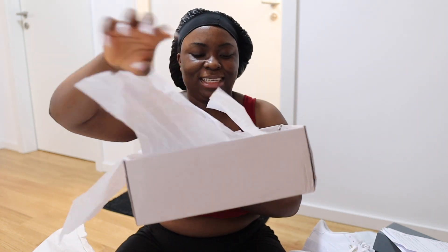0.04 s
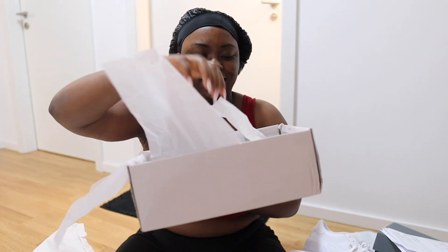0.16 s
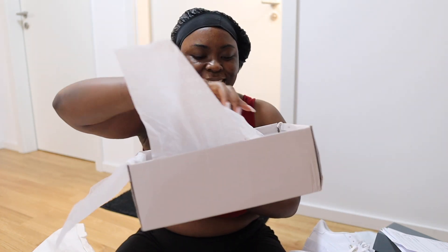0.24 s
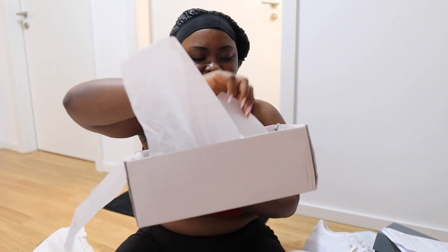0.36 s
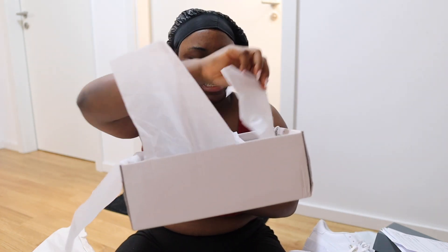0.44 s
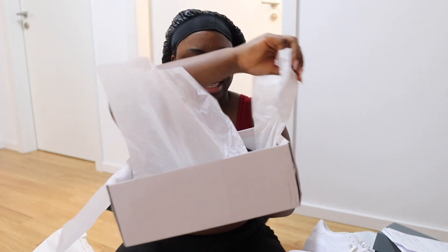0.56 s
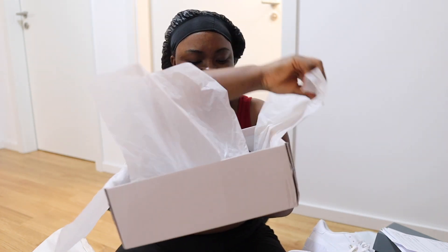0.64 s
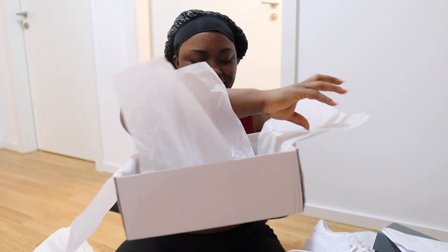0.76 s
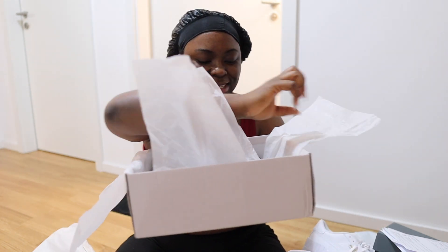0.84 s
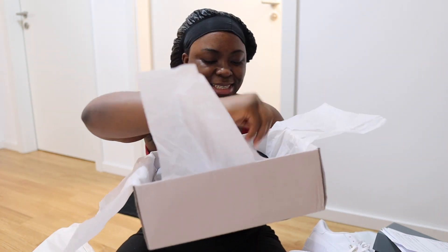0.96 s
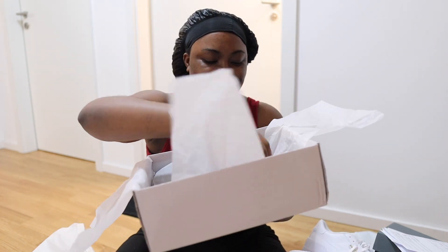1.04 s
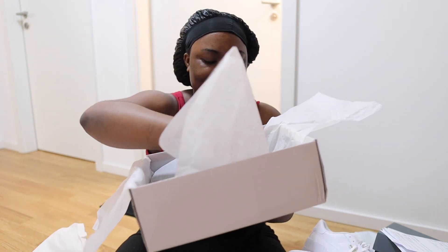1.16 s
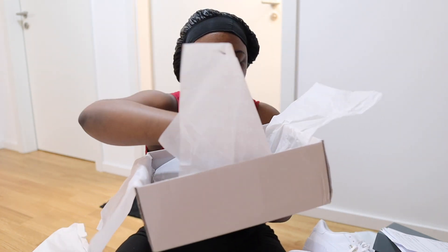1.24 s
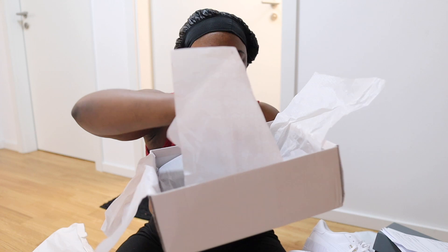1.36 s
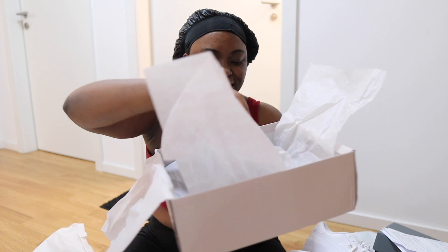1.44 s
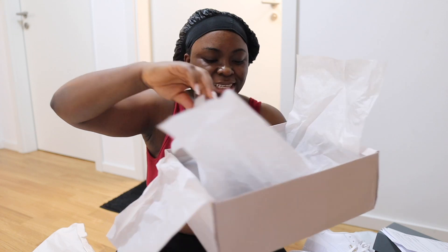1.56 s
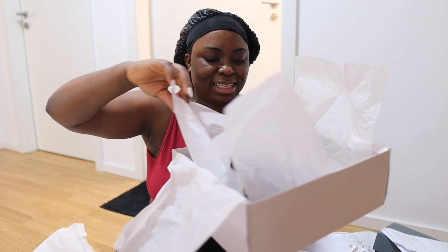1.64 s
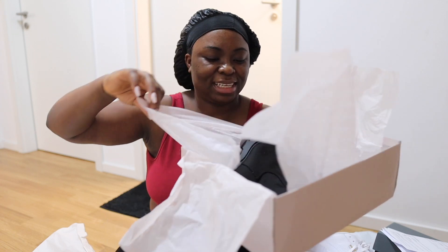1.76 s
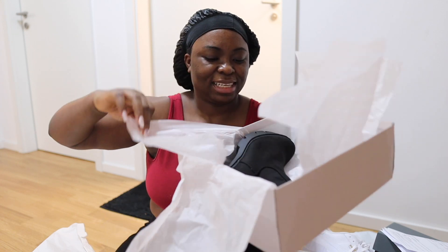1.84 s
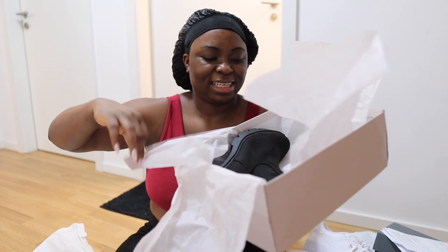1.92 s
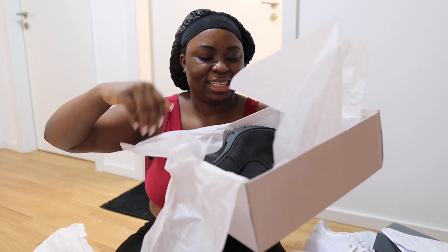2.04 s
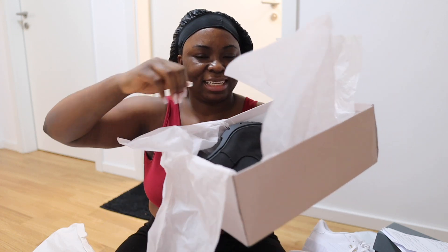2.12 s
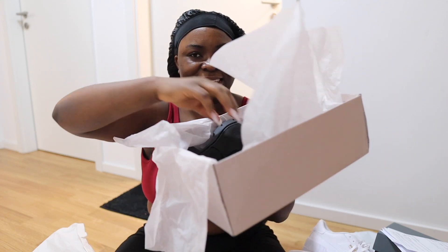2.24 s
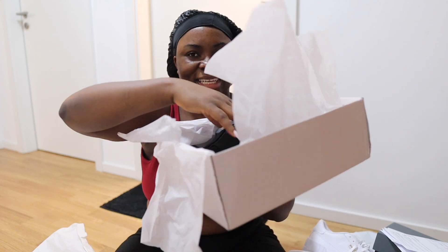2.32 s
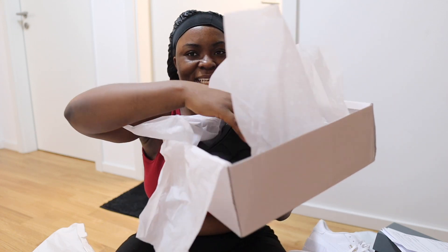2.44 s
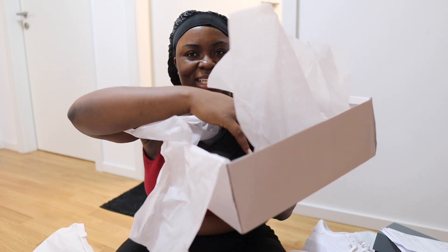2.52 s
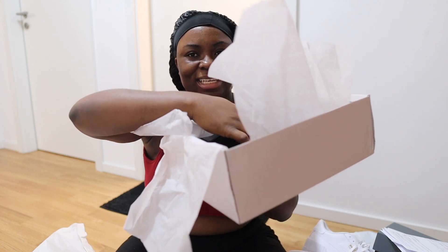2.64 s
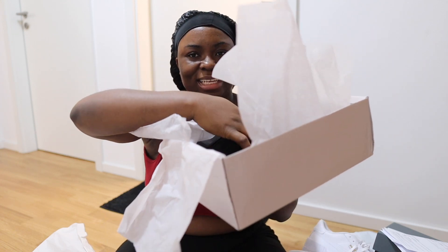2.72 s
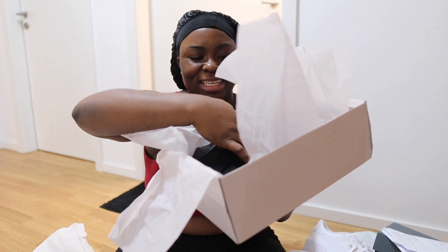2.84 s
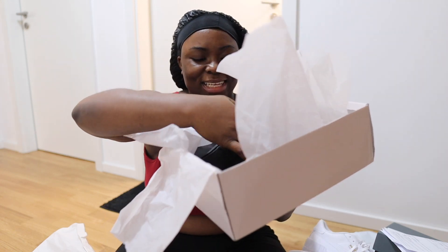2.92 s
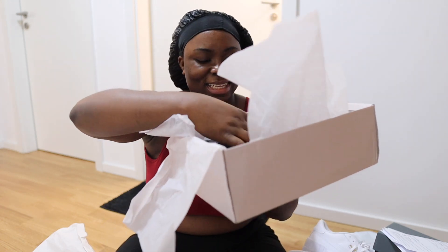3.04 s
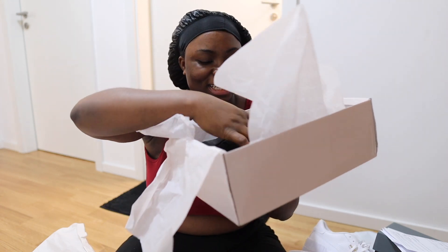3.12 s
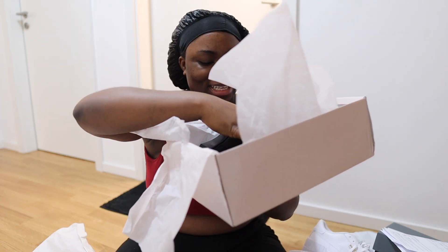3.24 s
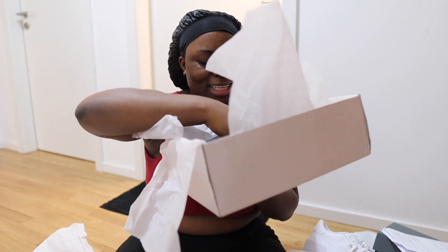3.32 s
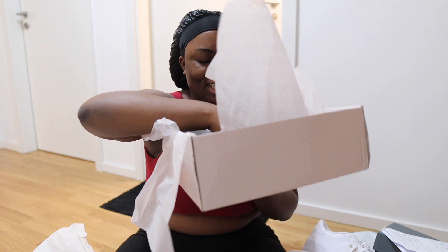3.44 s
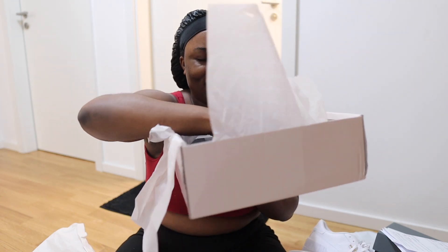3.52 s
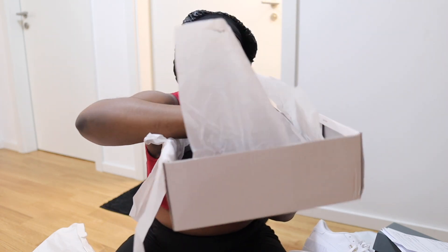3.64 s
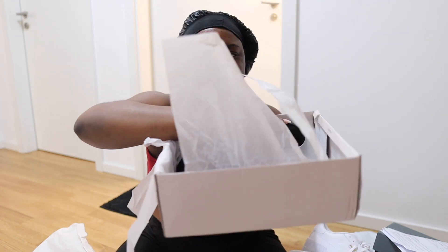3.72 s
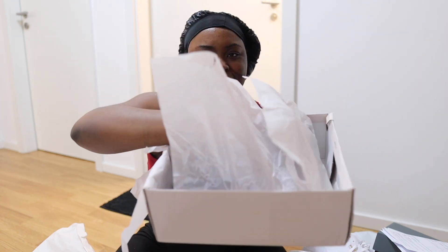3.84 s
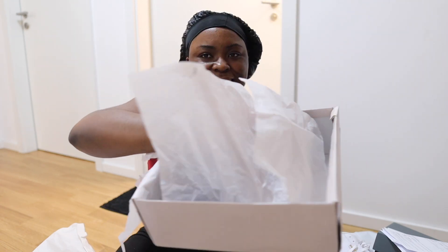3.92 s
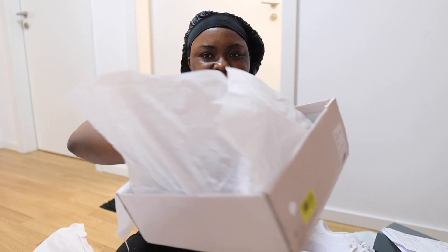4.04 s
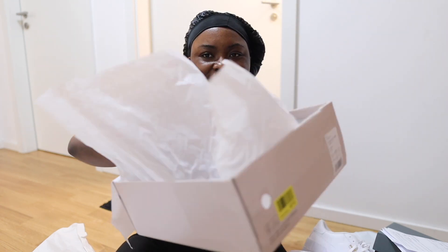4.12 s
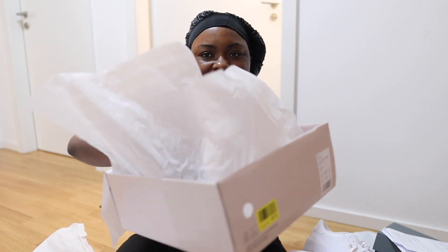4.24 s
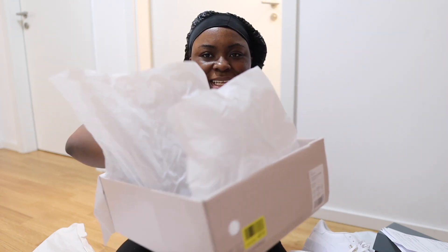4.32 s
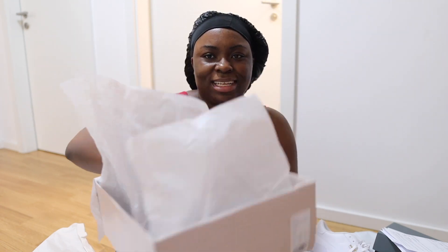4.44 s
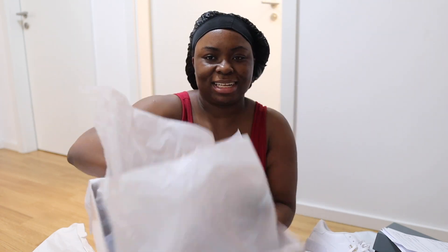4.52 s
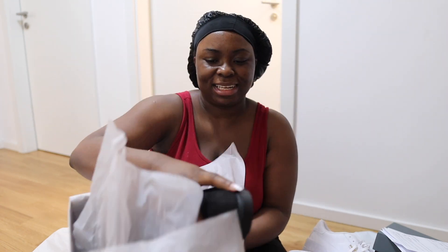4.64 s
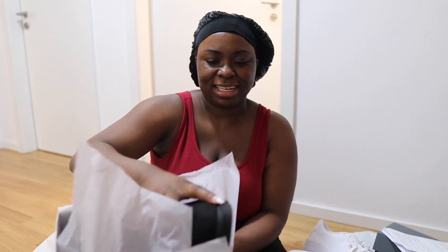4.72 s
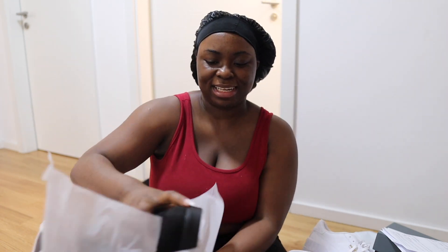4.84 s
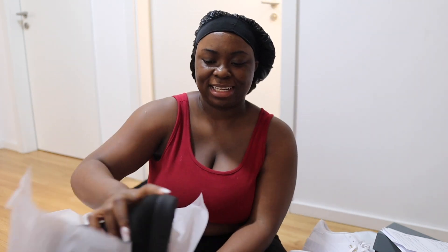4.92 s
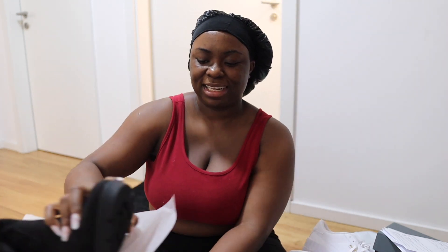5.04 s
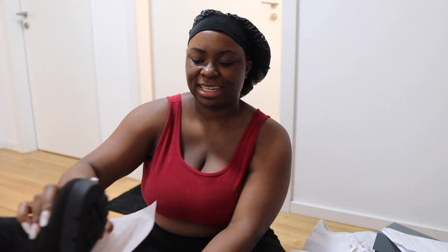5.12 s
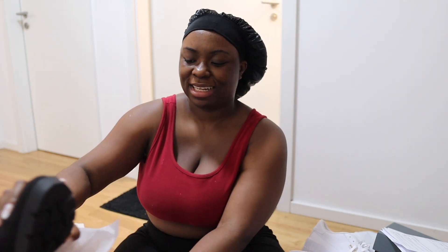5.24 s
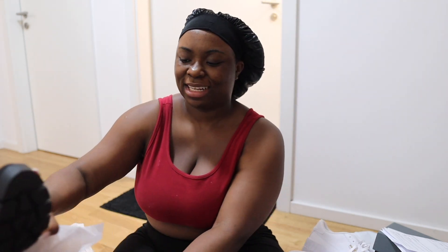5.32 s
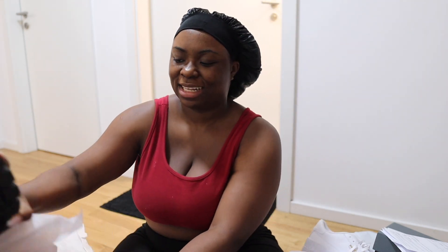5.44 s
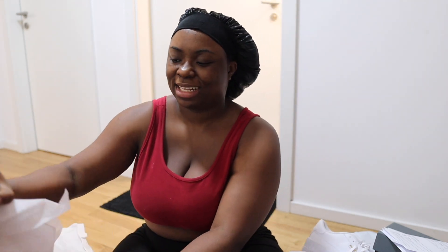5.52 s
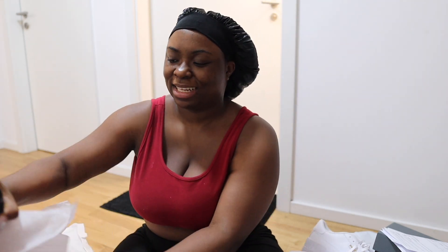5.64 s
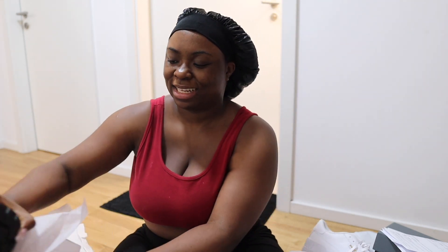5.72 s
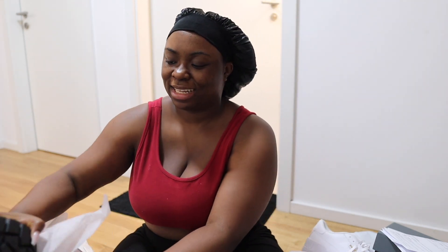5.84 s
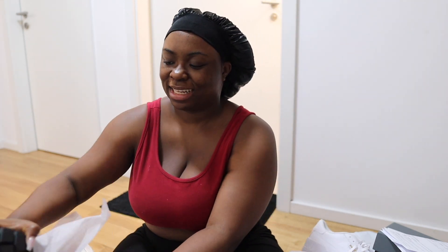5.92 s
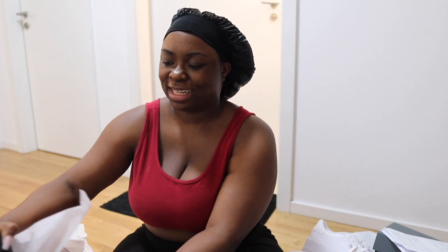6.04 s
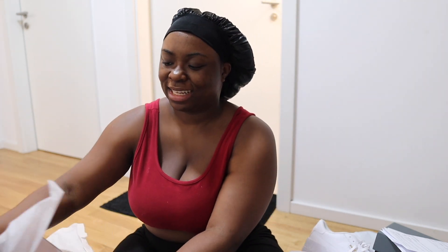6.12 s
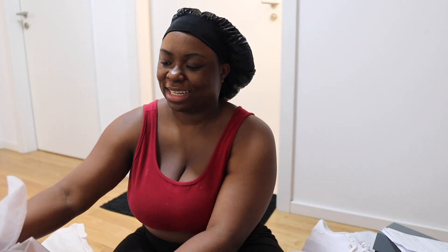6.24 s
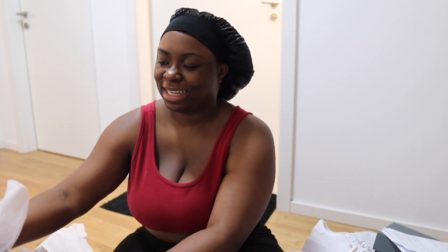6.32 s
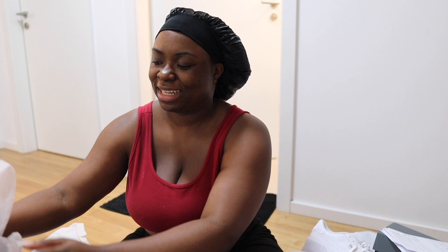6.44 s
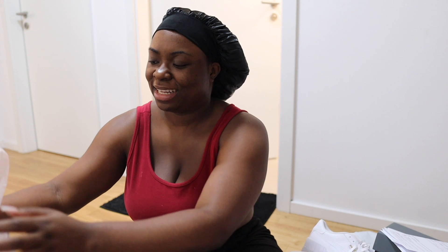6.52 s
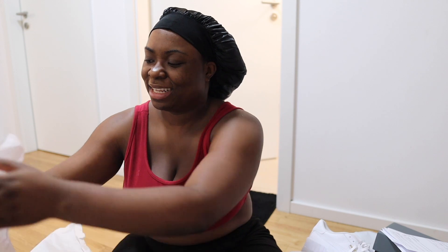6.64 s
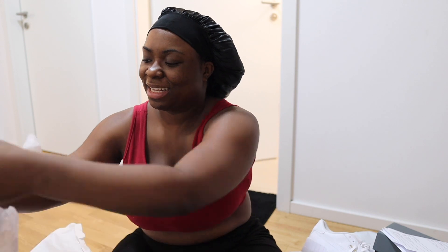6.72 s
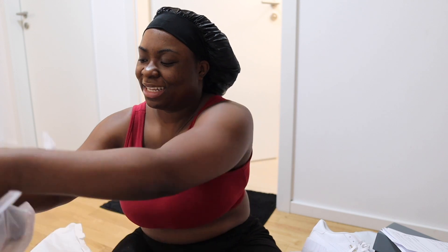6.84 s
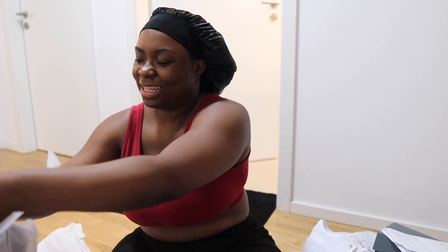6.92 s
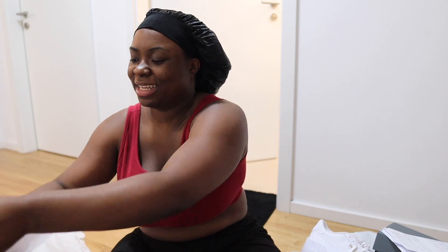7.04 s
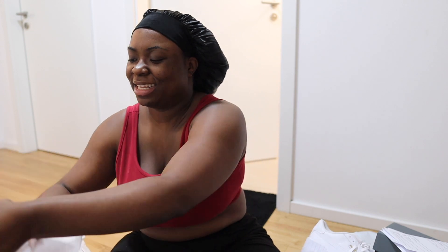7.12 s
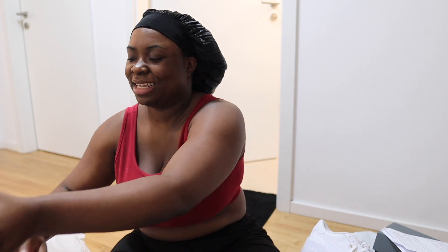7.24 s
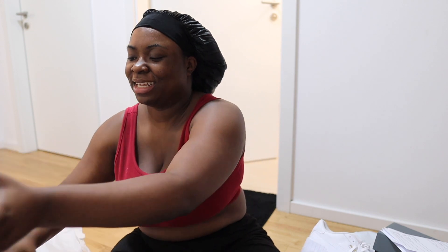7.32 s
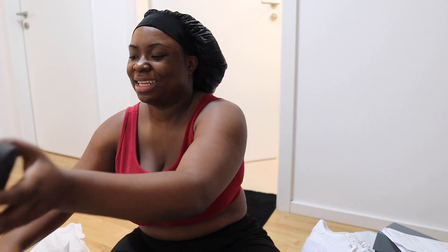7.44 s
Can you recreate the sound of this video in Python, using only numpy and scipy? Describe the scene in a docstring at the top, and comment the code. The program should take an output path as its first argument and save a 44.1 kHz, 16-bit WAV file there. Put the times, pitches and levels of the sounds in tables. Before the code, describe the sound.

Close crackling tugs of tissue paper in uneven bursts, while hands and a shoe scrape and bump a cardboard box.

```python
"""Tissue paper from a shoe box

Tissue paper is unfolded and pulled from a cardboard box in a small bare room. Thousands of creases
buckle as tiny clicks, a few snap alone; sheet edges sing as they slide over the rim. Hands and shoes
rub and knock the box, which booms. A close microphone pair with a widened image hears it."""
import sys
import numpy as np
from scipy import signal
from scipy.fft import rfft, irfft, next_fast_len
from scipy.io import wavfile
from scipy.ndimage import uniform_filter1d

SR = 44100
rng = np.random.default_rng(int(sys.argv[2]) if len(sys.argv) > 2 else 0)


def to_wav(s):
    """Save 16-bit WAV."""
    ch = np.atleast_2d(s).T  # columns
    pcm = np.round(np.clip(ch, -1, 1) * 32767)  # PCM
    wavfile.write(sys.argv[1], SR, pcm.astype(np.int16))


N = 329868

# tugs at the paper: t/s, length/s, start level/dB, end level/dB, treble/dB, big-fold fullness/dB
PAPER_TUGS = [(0, 0.032, -31, -25.5, -0.5, -10), (.04, 0.081, -29.5, -41.5, -11, -7),
              (.125, 0.033, -36, -38.5, -11, -11), (.2, 0.018, -40, -53, -25, -7),
              (.335, 0.054, -31, -25, -6, -10), (.4, 0.11, -26.5, -36, -2, 0),
              (.492, .008, -29, -31, 8, -3), (.505, 0.1, -19, -31, -1.5, -9),
              (.57, 0.19, -28.5, -29.5, -1.5, 1), (.76, 0.052, -39, -38.5, -7, -6),
              (1.062, 0.0068, -44, -26, -3.5, 11), (1.092, 0.013, -22, -27, -7, -4),
              (1.11, 0.19, -21, -29, -5.5, 1.5), (1.33, 0.029, -25.5, -25, -4, 4),
              (1.38, 0.19, -24.5, -21, -3, 2.5), (1.602, 0.035, -17, -18, -0.5, -1),
              (1.66, 0.054, -15, -20, -6.5, -5), (1.71, 0.079, -20.5, -20, -1.5, -0.5),
              (1.778, 0.082, -16.5, -21, -3.5, 1), (1.93, 0.03, -25.5, -19.5, -11.5, -1),
              (1.965, 0.029, -29.5, -21.5, 0.5, 4), (2.06, 0.11, -40, -53, -21, 3),
              (2.338, 0.038, -40, -32.5, -3, -19), (2.525, .02, -47, -61, 28, -2),
              (2.56, 0.054, -51.5, -58, 33, -13), (2.64, 0.025, -44, -45, 13, -5),
              (2.678, 0.015, -31.5, -36, 3, 2), (2.705, 0.053, -39.5, -40.5, -3, -0.5),
              (3.0, 0.052, -43, -50, -12, -30), (3.135, 0.017, -34, -36, 0.5, -7),
              (3.21, 0.023, -39.5, -41, -3, -3), (3.23, 0.032, -46, -33.5, 0, 0),
              (3.27, 0.077, -27.5, -27, -4.5, -1.5), (3.44, 0.018, -25, -29, -11, 3),
              (3.5, 0.16, -28, -34.5, -3.5, 8.5), (3.75, 0.094, -36, -31, -5.5, 2),
              (3.94, 0.0044, -28, -31.5, -9, -2), (4.01, 0.096, -27, -33, -16, 1.5),
              (4.115, 0.024, -45, -26, -4, 10), (4.152, 0.15, -25.5, -40, -6, 18),
              (4.31, 0.12, -26, -30, -12, 2.5), (4.51, 0.035, -31, -29, -40, 10),
              (4.56, 0.15, -20, -24.5, -10, 5.5), (4.742, 0.037, -27, -33.5, -23, 2),
              (4.92, 0.24, -35.5, -40, -18, 0.5), (5.03, 0.15, -29, -24.5, -13.5, 4.5),
              (5.18, 0.11, -25.5, -24, -8.5, 10), (5.27, 0.039, -30, -23.5, -10, 5.5),
              (5.335, 0.038, -23, -25.5, -8.5, 6.5), (5.527, 0.15, -30.5, -34, -5.5, 5.5),
              (5.68, 0.02, -31, -25, -11, 3), (5.725, 0.19, -24.5, -29, -2.5, 7),
              (6.06, 0.085, -29, -45.5, -4.5, -12), (6.21, 0.095, -41.5, -37, 2, 14),
              (6.265, 0.19, -34.5, -43.5, -6, 6.5), (6.462, 0.29, -34, -46.5, 0, 0),
              (6.88, 0.11, -41, -62, 28, 14), (6.99, 0.05, -40, -45.5, 6, 2),
              (7.07, 0.18, -35.5, -49.5, -13, 2), (7.29, 0.06, -42.5, -40.5, 8, 19),
              (7.34, 0.063, -33, -42, 4.5, 10)]
# stirring between moves, and box position: t/s, paper/dB, cardboard/dB, left over right/dB
STIRRING = [(0, -45, -52.5, 0.5), (.3, -54.5, -60.5, 0), (1.0, -50, -58.5, -0.5), (2.25, -62, -60, 0.5),
            (2.55, -51, -55, 0.5), (2.9, -58, -59, 0.5), (3.15, -47, -57, 0.5), (3.7, -36.5, -49, -0.5),
            (3.9, -40.5, -57, 0), (4.5, -37.5, -50, 0), (4.87, -48, -54, 0.5), (5.47, -47.5, -53, 3),
            (6.0, -39.5, -48, 1.5), (6.17, -42.5, -50, 3.5), (6.45, -40.5, -49, 2.5), (6.85, -42, -52, 2.5),
            (7.2, -41.5, -51, 1), (7.48, -38.5, -48, 2)]
# crackle spectrum: f/Hz, level/dB
PAPER_SPECTRUM = [(180, -48.5), (300, -56.5), (335, -65), (472, -18), (982, -14.5), (1240, -12),
                  (4060, -12.5), (9590, -14.5), (11200, -12.5), (12500, -3), (16200, -59), (22000, -120)]
# sheet edges on the rim: t/s, length/s, start f/Hz, end f/Hz, level/dB
EDGE_SLIDES = [(.02, 0.057, 950, 1000, -44), (.11, 0.084, 900, 1100, -51), (.32, 0.16, 946, 850, -46.5),
               (.56, 0.061, 896, 800, -37), (.64, 0.18, 700, 1600, -55), (3.0, 0.088, 2270, 2800, -58),
               (3.12, 0.127, 1576, 1500, -49), (3.75, 0.13, 1000, 900, -42.5), (4.92, 0.13, 681, 750, -40),
               (7.33, 0.067, 868, 500, -42)]
# lone creases: t/s, level/dB, low facet f/Hz, high facet f/Hz, high over low/dB, decay/ms
CREASE_SNAPS = [(0.193, -29, 3030, 5640, 7, 1.8), (0.331, -16.5, 3410, 7800, -1, 2.9),
                (0.5068, -8, 1500, 11100, -1, 3), (0.916, -37, 3500, 3830, 0, 1.9),
                (0.956, -42, 3010, 3560, -3, 1.5), (1.066, -15, 1820, 6550, 4, 2.1),
                (2.2402, -30.5, 3300, 8550, 11, 2), (2.312, -55, 3000, 7000, 5, 1.3),
                (2.333, -28.5, 2140, 5330, 7, 3.2), (2.523, -32, 3100, 11250, 19, 4),
                (2.622, -34, 1960, 8000, 4, 3), (2.644, -24, 2460, 6440, 14, 2.7),
                (2.676, -25, 2030, 9150, 7, 3), (2.681, -16.5, 1980, 5500, -3, 3.5),
                (2.7073, -16.5, 1320, 9400, -1, 2), (2.7538, -28, 2070, 3560, 9, 2.1),
                (2.8644, -27, 3950, 9200, 3, 1.5), (2.922, -38, 1310, 6000, 8, 1.1),
                (2.9527, -38, 2150, 6160, 12, 3.4), (2.979, -32, 2400, 4840, 4, 3.4),
                (2.9988, -14.5, 2460, 4570, -0.5, 1.1), (3.006, -33, 2500, 4730, 5, 9.5),
                (3.066, -29, 2820, 5070, 2, 5.7), (3.084, -30, 2960, 6500, -3, 2.5),
                (3.122, -30, 3060, 4740, 0, 3.7), (3.136, -20, 2760, 6800, 7, 1.7),
                (3.147, -21, 1540, 8100, -11, 2.2), (3.199, -23.5, 2750, 5100, -14, 2.7),
                (3.2127, -24, 1410, 5400, -8, 2.5), (3.266, -18, 1550, 3700, -10, 2),
                (3.432, -14, 2160, 5570, -8, 1.1), (3.82, -15.5, 2900, 3700, 10, 1.7),
                (3.928, -17, 1640, 4240, -3, 3.5), (3.938, -12, 1700, 6500, 8, 1.3),
                (3.998, -22, 2520, 9050, 5, 7.7), (4.0462, -15, 1860, 3800, -21, 2.2),
                (4.1403, -17, 2340, 6740, 3, 3), (4.1455, -7, 1100, 1590, -1, 1.2),
                (4.153, -20, 1090, 2000, -3, 0.86), (4.303, -13.5, 1220, 4760, -4, 5),
                (4.356, -15.5, 5200, 10700, -1, 3), (4.564, -11, 1950, 5100, -2, 2.1),
                (4.7398, -3, 1540, 3190, 3, 1.3), (4.977, -17, 2180, 5200, -10, 1.3),
                (5.0326, -19, 1900, 4840, -10, 1.5), (5.071, -11, 1980, 10660, -6, 2.5),
                (5.527, -18, 2350, 4500, -7, 1.6), (6.058, -24, 2480, 5050, 21, 4),
                (6.215, -26, 2750, 11100, 4, 1.9), (6.454, -21, 1920, 6200, 0, 4.5),
                (6.479, -14.5, 1950, 2590, -12, 5.6), (6.877, -24.5, 1290, 4830, 17, 3),
                (6.895, -35, 2000, 5000, 6, 4), (6.984, -28, 1900, 7430, 2, 4),
                (7.338, -22, 1550, 10800, 3, 2.5)]
# drags on the cardboard: t/s, length/s, start level/dB, end level/dB, relative boom/dB
BOX_RUBS = [(.375, 0.1, -37.5, -51, -11), (.5, 0.034, -32, -38, 6.5), (.68, 0.036, -44, -41, -9),
            (1.08, 0.15, -40, -40, 8.5), (1.33, 0.39, -47, -33, -11), (1.795, 0.15, -37.5, -42, 4),
            (1.93, 0.065, -45, -34, -3), (2.69, 0.029, -48, -59, -9), (3.27, 0.088, -28.5, -40, 0),
            (3.5, 0.04, -36, -46, 6.5), (3.565, 0.059, -45, -43, 13), (3.675, 0.018, -51, -55, 13),
            (3.77, 0.026, -45, -62, -13), (4.0, 0.073, -65, -52, -7), (4.155, 0.085, -22.5, -39, 7),
            (4.29, 0.14, -25.5, -45, 2), (4.53, 0.021, -47, -40, 6), (4.565, 0.24, -29.5, -49, 2.5),
            (4.92, .012, -55, -63, -20), (5.0, 0.011, -35, -57, -10), (5.08, 0.21, -46, -40, -7),
            (5.3, 0.089, -33, -35, 7), (5.54, 0.11, -48, -61, 2), (5.7, 0.026, -37, -41, 1),
            (5.735, 0.053, -21.5, -23, -7), (5.79, 0.047, -45, -23.5, 0), (5.88, 0.036, -40, -34.5, 15),
            (6.08, 0.033, -38.5, -47, 15), (6.23, 0.011, -32, -62, 0), (6.33, .08, -37, -46, -8),
            (6.475, 0.12, -24.5, -34, 2.5), (6.6, 0.26, -47, -58, -2), (6.98, 0.067, -47, -44, -4),
            (7.066, 0.049, -33.5, -40, 11), (7.14, 0.16, -51, -50, -4), (7.33, 0.14, -53, -50, -8)]
# rubbing spectrum: f/Hz, level/dB
CARDBOARD_SPECTRUM = [(150, -30), (260, -4), (340, 0), (550, 0), (820, -2), (1180, -9), (2500, -18),
                      (3500, -45)]
# modes of the walls and the air inside: f/Hz, level/dB, t60/s
BOX_MODES = [(115, 4, .1), (195, 0, .19), (259, 0, .3), (320, -2, .06), (400, -2, .05), (475, -2, .05),
             (545, -1, .05), (630, -2, .04), (810, -1, .035), (1050, -5, .025), (1350, -8, .02)]
# blows on the box: t/s, wall level/dB, struck spot f/Hz, boom level/dB, boom f/Hz
BOX_KNOCKS = [(0.496, -31, 856, -41, 291), (0.584, -20, 1090, -46, 275), (1.068, -29, 1190, -31, 291),
              (1.786, -15, 500, -17.5, 195), (2.333, -43, 500, -41, 115), (2.41, -60, 500, -42, 195),
              (2.465, -57, 400, -41, 115), (2.511, -60, 500, -45, 195), (2.637, -31, 482, -58, 259),
              (2.654, -38, 490, -58, 259), (2.681, -33, 560, -45, 259), (2.71, -29, 520, -55, 259),
              (3.264, -20, 476, -31.5, 283), (3.5, -12.5, 1060, -16.5, 196), (3.593, -21, 550, -42, 205),
              (3.763, -26, 589, -41, 266), (4.144, -5.5, 446, -23.5, 263), (4.146, -28, 400, -32, 115),
              (4.157, -28, 436, -18, 200), (4.178, -11, 600, -32, 199), (4.199, -32, 440, -25, 262),
              (4.267, -19, 330, -17.5, 262), (4.293, -10.5, 700, -31, 200), (4.306, -11, 675, -28, 262),
              (4.337, -37, 500, -22, 260), (4.561, -32, 870, -18, 207), (4.571, -35, 500, -28, 115),
              (4.914, -21, 720, -58, 218), (5.302, -24, 533, -27, 218), (5.733, -5.5, 840, -23, 242),
              (5.75, -0.5, 820, -17, 268), (5.789, -26, 500, -32, 115), (5.801, -9.5, 870, -27, 264),
              (5.849, -23, 385, -16, 214), (5.929, -20, 907, -31, 256), (6.085, -36, 460, -33.5, 122),
              (6.463, -10.5, 825, -14, 290), (6.469, -27, 400, -22.5, 115), (6.477, -13, 365, -27, 250),
              (6.505, -27, 335, -41, 291), (6.515, -9.5, 350, -19.5, 241), (6.555, -21, 450, -26, 259),
              (6.588, -24, 400, -33, 259), (6.637, -45, 500, -33, 259), (7.063, -43, 400, -28, 115),
              (7.063, -37, 608, -21.5, 174), (7.081, -21, 608, -24, 202), (7.094, -23, 600, -27, 260),
              (7.125, -40, 500, -37, 195), (7.338, -17, 820, -52, 231)]
# room and microphone noise: f/Hz, level/dB
NOISE_SPECTRUM = [(24, -52), (40, 8), (257, 8.5), (593, 1), (701, -2), (2310, 1), (5080, -3), (9450, -17),
                  (12000, -43), (15600, -49), (22000, -120)]
# stereo width: f/Hz, side gain/dB
SIDE_GAIN = [(60, -49), (110, -19), (200, -16), (380, -13), (700, -7), (1290, -3.5), (2380, 0.5), (4400, 3),
             (8120, 3), (15000, 11)]


def amp(db):
    """Decibels to gain."""
    return 10 ** (np.asarray(db) / 20)


def rms_one(x):
    """Scale to rms 1."""
    return x / np.sqrt(np.mean(x ** 2) + 1e-20)


def butter(x, order, hz, kind="low"):
    """Butterworth filter."""
    return signal.sosfilt(signal.butter(order, hz, kind, fs=SR, output="sos"), x)


def in_time(rows):
    """Columns of a time table, one value per sample."""
    times_s, *columns = np.transpose(rows)
    return [np.interp(np.arange(N) / SR, times_s, column) for column in columns]


def db_at(spectrum, hz):
    """Read a spectrum on a log-frequency axis."""
    points_hz, points_db = np.transpose(spectrum)
    return np.interp(np.log(hz), np.log(np.maximum(points_hz, 1)), points_db)


def coloured(x, spectrum):
    """Filter by a table of f/Hz, level/dB."""
    size = next_fast_len(N)
    hz = np.maximum(np.arange(size // 2 + 1) * SR / size, 1)
    return irfft(rfft(x, size) * amp(db_at(spectrum, hz)), size)[..., :N]


def drift(rate_hz):
    """Slow random wander, rms 1."""
    r = np.exp(-2 * np.pi * rate_hz / SR)
    return rms_one(signal.lfilter([1], [1, -2 * r, r * r], rng.standard_normal(N + SR))[SR:])


def ring(drive, hz, t60_s):
    """Resonator: a unit click starts a decaying unit sine."""
    r, w = amp(-60 / (t60_s * SR)), 2 * np.pi * hz / SR
    return signal.lfilter([0, np.sin(w)], [1, -2 * r * np.cos(w), r * r], drive + 1e-18)


def clicks(per_s, spread_db, clump_db):
    """Random clicks in clumps, the bigger ones rare."""
    fires = rng.random(N) < per_s * amp(clump_db * drift(25)) / SR
    return fires * amp(spread_db * np.minimum(rng.exponential(1, N), 5)) * rng.choice([-1, 1], N)


def envelopes(moves, rest_db, rest_tones_db, rise_db_per_s, fall_db_per_s):
    """Level and tone curves in dB: moves rise, ramp and fall; powers add, tone follows the louder."""
    t, sample_t = np.arange(0, N + 32, 32) / SR, np.arange(N) / SR
    start_s, length_s, start_db, end_db, *tones_db = np.transpose(moves)[:, :, None]
    age_s = t - start_s
    ramp_db = start_db + (end_db - start_db) * np.clip(age_s / np.maximum(length_s, 1e-3), 0, 1)
    skirt_db = rise_db_per_s * np.maximum(-age_s, 0) + fall_db_per_s * np.maximum(age_s - length_s, 0)
    power = amp(ramp_db - skirt_db) ** 2
    rest_power = amp(np.interp(t, sample_t, rest_db)) ** 2
    total = power.sum(axis=0) + rest_power
    mixed_db = [((power * tone).sum(axis=0) + rest_power * rest_tone) / total
                for tone, rest_tone in zip(tones_db, rest_tones_db)]
    return [np.interp(sample_t, t, curve) for curve in [10 * np.log10(total), *mixed_db]]


def crackle():
    """Buckling creases each shake a facet for a few cycles, with random shares in mid and side."""
    level_db, treble_db, full_db = envelopes(PAPER_TUGS, in_time(STIRRING)[0], rest_tones_db=[-13.5, 2.5],
                                             rise_db_per_s=956, fall_db_per_s=279)
    per_s = np.clip(17000 * amp(.45 * (level_db + 40)), 4000, 40000)   # harder tug, more creases
    buckles = clicks(per_s, spread_db=.8, clump_db=1.5) / np.sqrt(per_s) * rng.standard_normal((2, N))
    facets_hz = np.geomspace(350, 13000, 26)
    facet_hit = rng.choice(len(facets_hz), N, p=np.sqrt(facets_hz) / np.sqrt(facets_hz).sum())
    patches = [drift(12.2) for _ in range(13)]   # facet groups stiffen and slacken as the sheet bends
    folds = [drift(4) for _ in range(9)]   # each fold has its own colour
    out = np.zeros((2, N))
    for k, hz in enumerate(facets_hz):
        facet = butter(buckles * (facet_hit == k) + 1e-18, 1, [hz / 1.1, hz * 1.1], "band")
        top_share = np.clip(np.log2(hz / 3500) / 1.99, 0, 1.2)
        low_share = np.clip(np.log2(2000 / hz) / 1.35, 0, 1)
        colour_db = db_at(PAPER_SPECTRUM, hz) + top_share * treble_db + low_share * full_db
        flicker_db = (1 + 2.37 * top_share) * patches[k // 2] + 1.27 * folds[k // 3]
        out += rms_one(facet) * np.sqrt(hz / 3000) * amp(colour_db + flicker_db)
    return amp(level_db) * out


def slides(half_width_hz=83, fade_s=.01):
    """Sheet edge on the rim: stick-slip noise in a narrow resonance that glides with the free length."""
    out = np.zeros(N)
    roughness = rms_one(butter(rng.standard_normal((2, N)), 2, half_width_hz))
    for start_s, length_s, start_hz, end_hz, level_db in EDGE_SLIDES:
        t, onset = np.arange(round(length_s * SR)) / SR, round(start_s * SR)
        glide_hz = start_hz * (end_hz / start_hz) ** (t / length_s)
        phase = 2 * np.pi * np.cumsum(glide_hz) / SR
        sin_gain, cos_gain = roughness[:, onset:onset + len(t)]
        tone = sin_gain * np.sin(phase) + cos_gain * np.cos(phase)
        fade = np.clip(np.minimum(t, length_s - t) / fade_s, 0, 1)
        out[onset:onset + len(t)] += amp(level_db) * fade * tone
    return out


def snaps(rise_share=.2, tick_gain=.2, roughness=2.8):
    """Lone creases: the two facets beside the fold ring briefly over a broad tick."""
    out, t = np.zeros(N + 2000), np.arange(1800) / SR
    for start_s, level_db, low_hz, high_hz, high_db, decay_ms in CREASE_SNAPS:
        noise = rng.standard_normal(len(t))
        facets = np.sin(2 * np.pi * low_hz * t) + amp(high_db) * np.sin(2 * np.pi * high_hz * t)
        flutter = 1 + roughness * uniform_filter1d(noise, size=16)
        snap = facets / (1 + amp(high_db)) * flutter + tick_gain * noise
        age = 1000 * t / decay_ms
        envelope = (1 - np.exp(-age / rise_share)) * np.exp(-age)
        out[round(start_s * SR):][:len(t)] += amp(level_db) * envelope * snap
    return butter(out[:N], 2, 900, "high")


def rubbing():
    """Stick-slip under fingers and soles: dull grains; broad contact adds bass, rings the low modes."""
    slips = clicks(per_s=1500, spread_db=.5, clump_db=2.5)
    level_db, boom_db = envelopes(BOX_RUBS, in_time(STIRRING)[1], rest_tones_db=[5.5],
                                  rise_db_per_s=1500, fall_db_per_s=347)
    grains = amp(level_db) * rms_one(coloured(slips, CARDBOARD_SPECTRUM))
    bass = butter(signal.lfilter([1], [1, -.9], slips), 1, [170, 300], "band")
    drive = amp(level_db + boom_db) * rms_one(bass)
    hollow = sum(amp(db - 63) * ring(drive, hz, t60_s) for hz, db, t60_s in BOX_MODES[:3])
    return grains + .17 * drive + hollow


def knocks(attack_cycles=.5, grip_detune=.012, push_db=-4, push_cycles=.9):
    """Soft blows: the spot gives way once, then box modes ring, most near the spot and boom pitches."""
    out, t = np.zeros(N + SR), np.arange(SR // 3) / SR
    mode_hz, mode_db, t60_s = np.transpose(BOX_MODES)[:, :, None]
    polarity = (-1) ** np.arange(len(BOX_MODES))[:, None]
    envelope = amp(mode_db - 60 * t / t60_s) * (1 - np.exp(-t * mode_hz / attack_cycles))
    for start_s, level_db, spot_hz, boom_db, boom_hz in BOX_KNOCKS:
        grip = 1 + grip_detune * rng.standard_normal(mode_hz.shape)   # the grip shifts the modes
        modes = polarity * envelope * np.sin(2 * np.pi * mode_hz * grip * t)
        walls_db = level_db - 6 - 14 * np.abs(np.log2(mode_hz / spot_hz))
        hollow_db = boom_db - 6 - 28 * np.abs(np.log2(mode_hz / boom_hz))
        ringing = np.sum(amp(np.where(mode_hz < 300, hollow_db, walls_db)) * modes, axis=0)
        push = sum(amp(db + push_db) * np.sin(2 * np.pi * hz * t) * np.exp(-t * hz / push_cycles)
                   for db, hz in [(level_db, spot_hz), (boom_db, boom_hz)])
        out[round(start_s * SR):][:len(t)] += push + ringing
    return out[:N]


def room(mid_side, t60_s=.14, echo_db=-7, renew_s=.25):
    """Mid and side get their own short, diffuse echoes, redrawn every renew_s; bass is mostly direct."""
    t, hop = np.arange(round(.3 * SR)) / SR, round(renew_s * SR)
    decay = amp(-60 * t / t60_s)
    envelope = amp(echo_db) * decay * (t > .003) / np.sqrt(np.sum(decay ** 2))
    padded = np.pad(mid_side, ((0, 0), (hop, 2 * hop)))
    window = np.sqrt(signal.windows.hann(2 * hop, sym=False))
    wet = np.zeros((2, N + 5 * hop + len(t)))
    for i in range(0, N + hop, hop):
        response = envelope * butter(rng.standard_normal((2, len(t))), 1, 1200, "high")
        echoes = signal.fftconvolve(padded[:, i:i + 2 * hop] * window, response, axes=1)
        wet[:, i:i + echoes.shape[1]] += echoes
    return mid_side + wet[:, hop:hop + N]


def scene(noise_db=-61.5, top_hz=12330, sparkle_db=-3):
    """All sources in the room, top treble cut but for the snaps; mid and side to left and right."""
    creases = snaps()
    direct = creases + slides() + rubbing() + knocks()
    # spaced capsules: side leads mid by a quarter cycle
    direct_side = -signal.hilbert(direct, next_fast_len(N)).imag[:N]
    noise = amp(noise_db) * rms_one(coloured(rng.standard_normal((2, N)), NOISE_SPECTRUM))
    heard = butter(room(crackle() + [direct, direct_side]) + noise, 14, top_hz)
    sparkle = amp(sparkle_db) * butter(creases, 4, top_hz, "high")
    mid, side = heard + sparkle * [[1], [.5]]
    left_right = mid + coloured(side, SIDE_GAIN) * [[1], [-1]]
    pan_db = in_time(STIRRING)[2]
    return left_right * amp(pan_db * [[.5], [-.5]])


def record(dry, low_cut_hz=85, high_cut_hz=15750):
    """Soft clip, low cut, steep high cut."""
    rounded = .95 * np.tanh(dry / .95)
    thinned = butter(rounded, 2, low_cut_hz, "high")
    return signal.sosfilt(signal.cheby2(12, 70, high_cut_hz, fs=SR, output="sos"), thinned)


dry = scene()
out = record(dry)
to_wav(out)
```